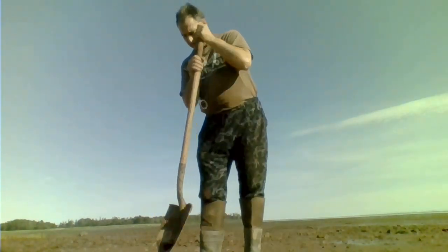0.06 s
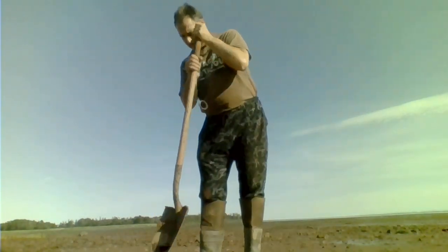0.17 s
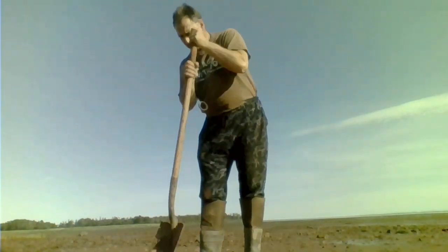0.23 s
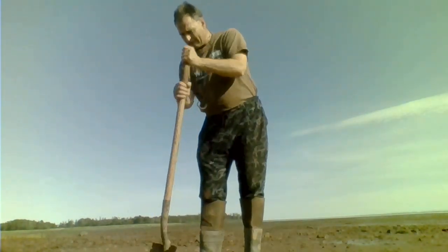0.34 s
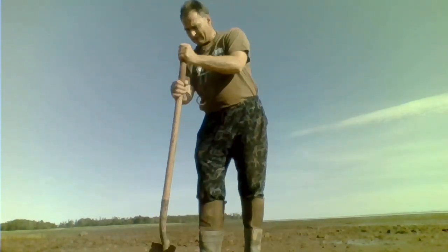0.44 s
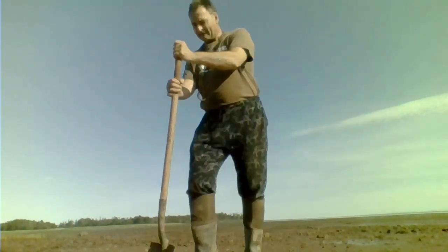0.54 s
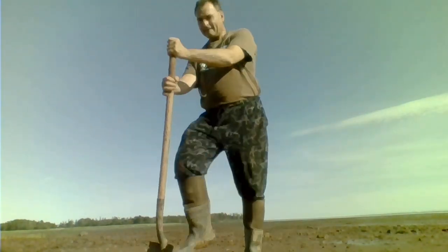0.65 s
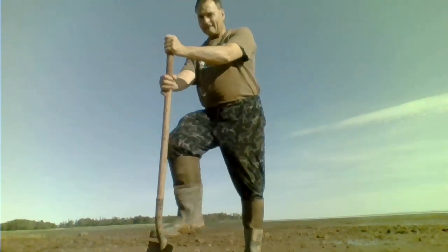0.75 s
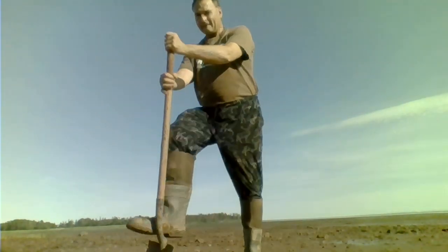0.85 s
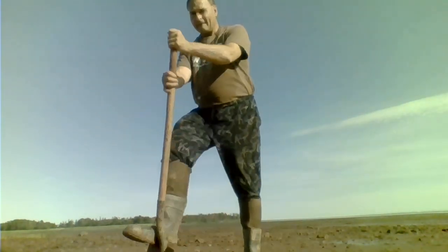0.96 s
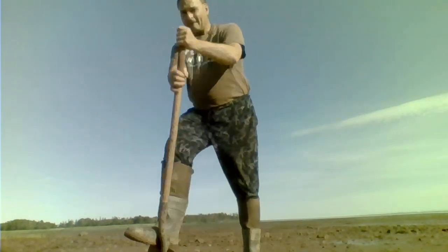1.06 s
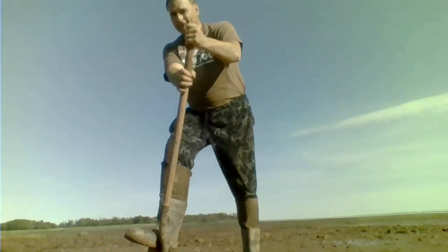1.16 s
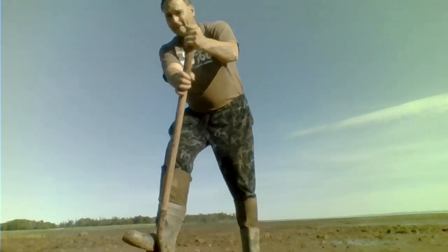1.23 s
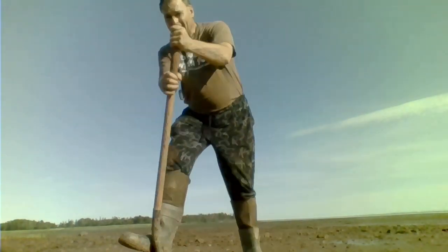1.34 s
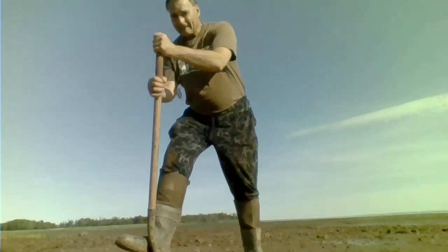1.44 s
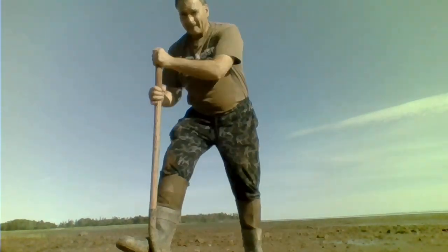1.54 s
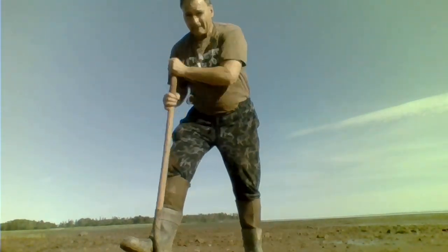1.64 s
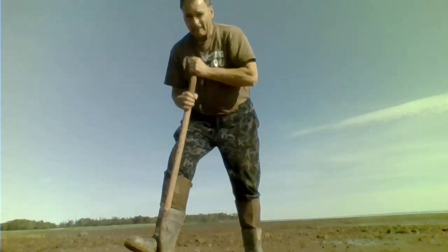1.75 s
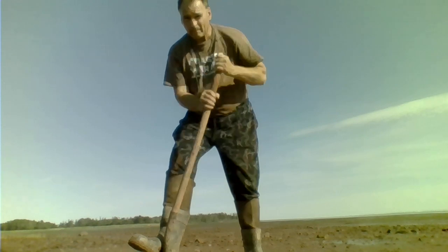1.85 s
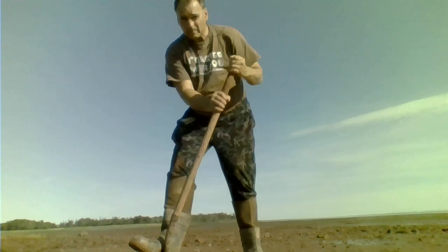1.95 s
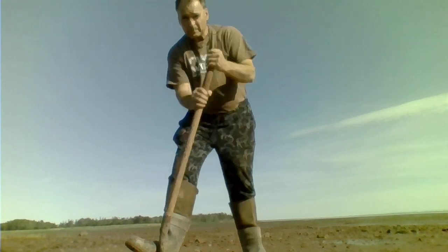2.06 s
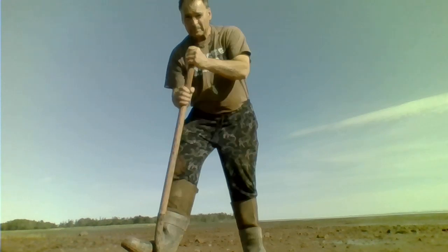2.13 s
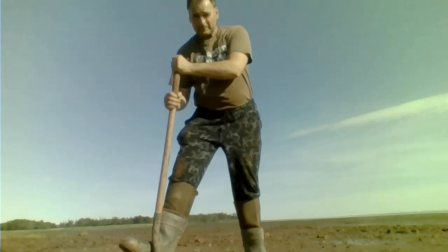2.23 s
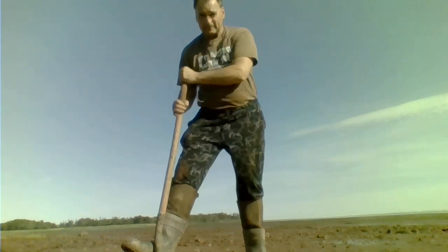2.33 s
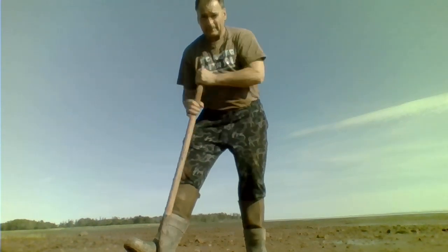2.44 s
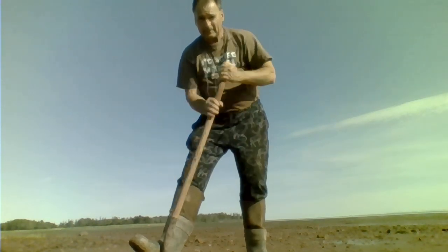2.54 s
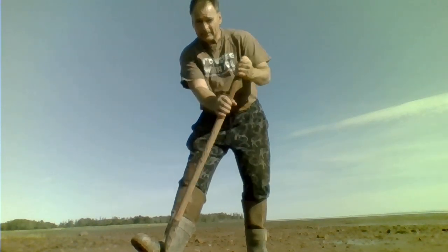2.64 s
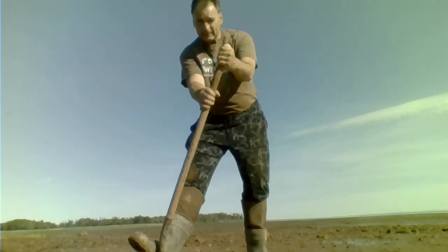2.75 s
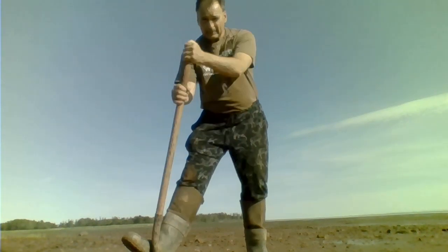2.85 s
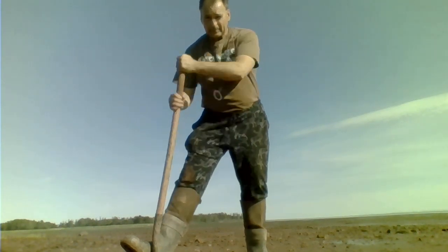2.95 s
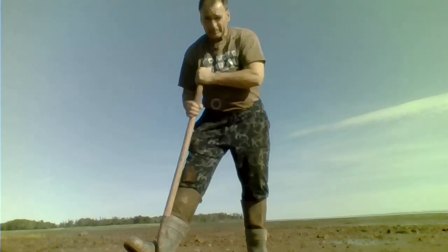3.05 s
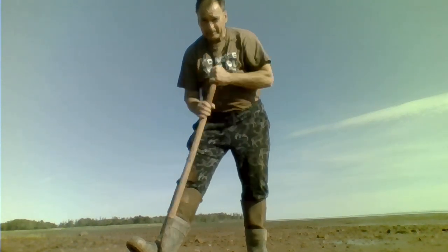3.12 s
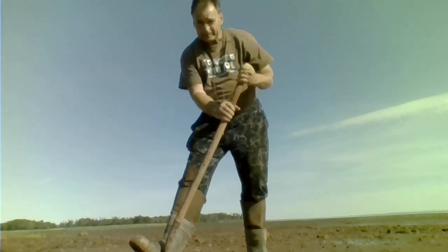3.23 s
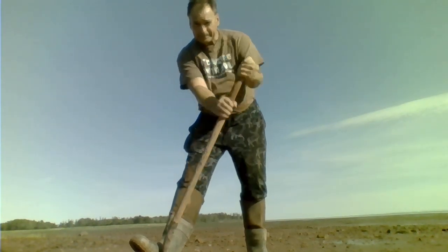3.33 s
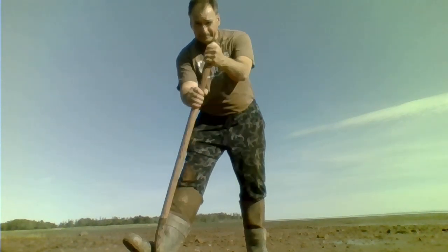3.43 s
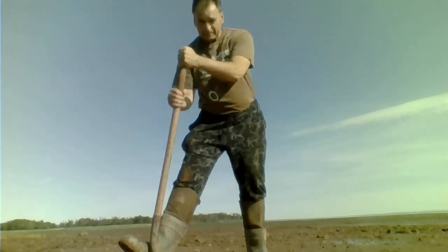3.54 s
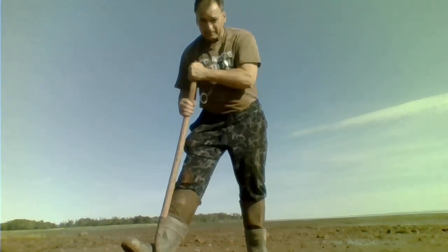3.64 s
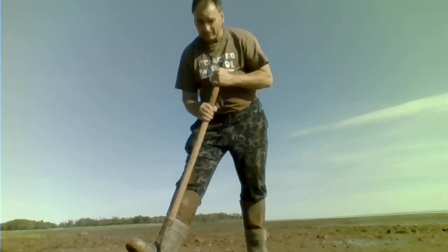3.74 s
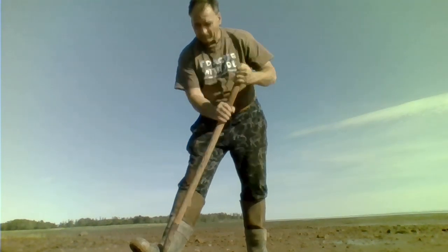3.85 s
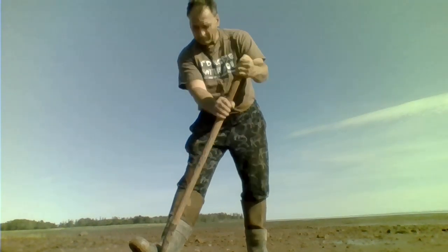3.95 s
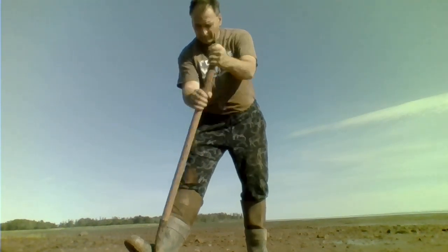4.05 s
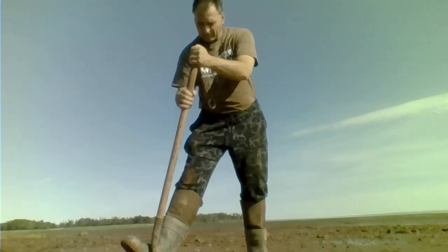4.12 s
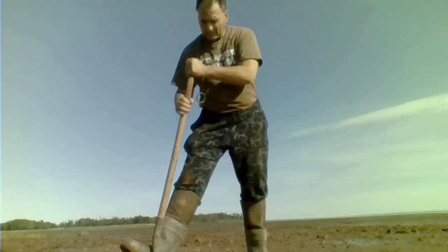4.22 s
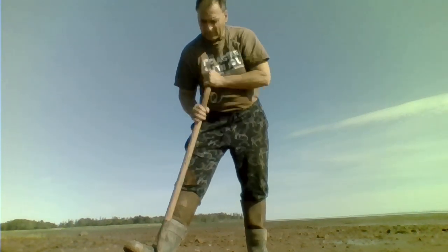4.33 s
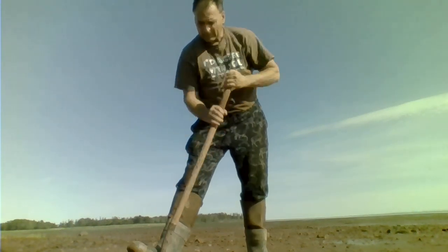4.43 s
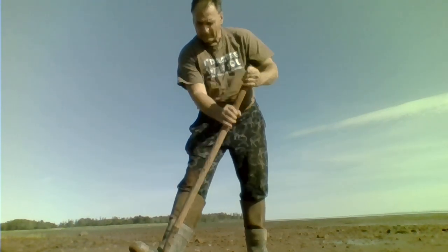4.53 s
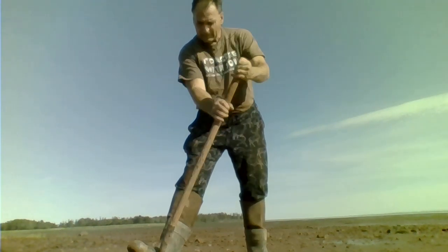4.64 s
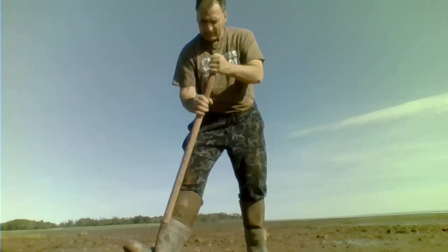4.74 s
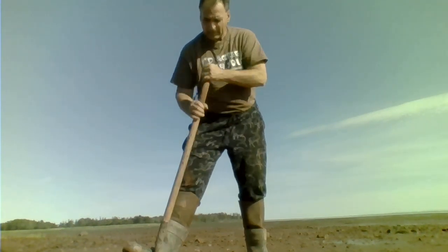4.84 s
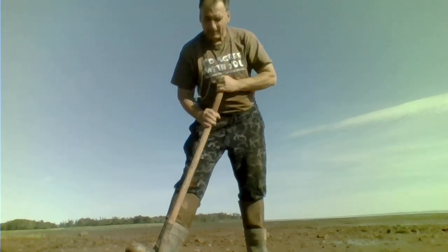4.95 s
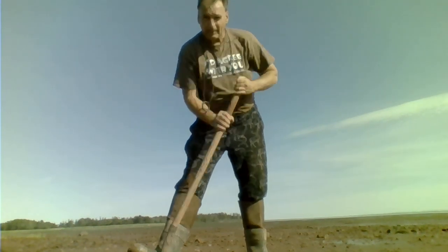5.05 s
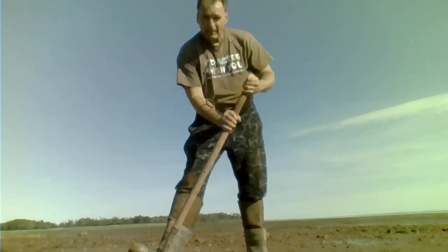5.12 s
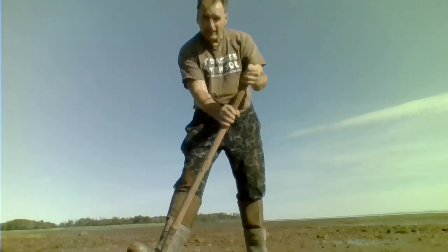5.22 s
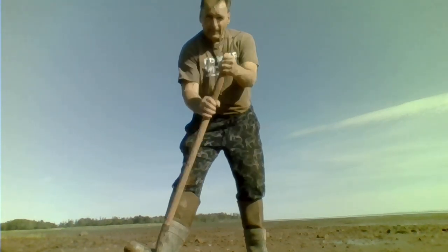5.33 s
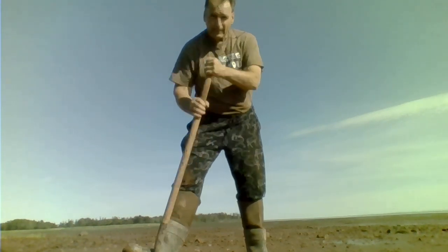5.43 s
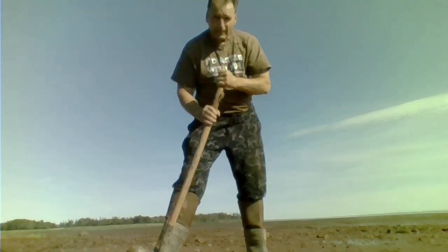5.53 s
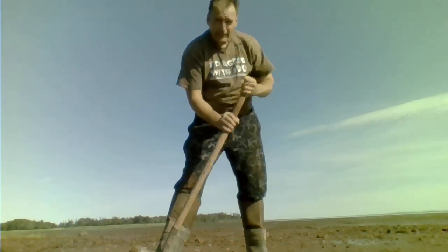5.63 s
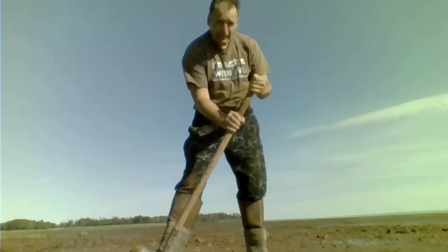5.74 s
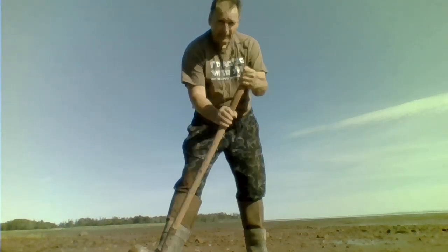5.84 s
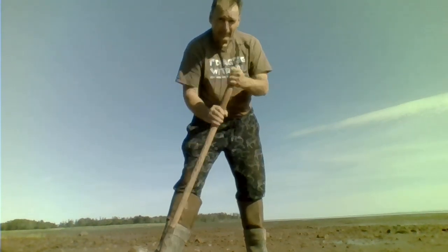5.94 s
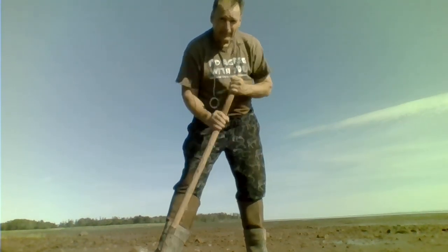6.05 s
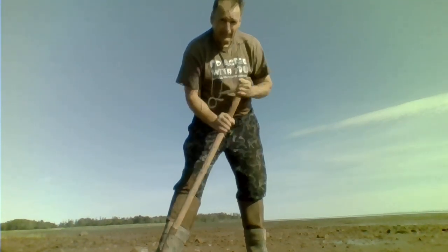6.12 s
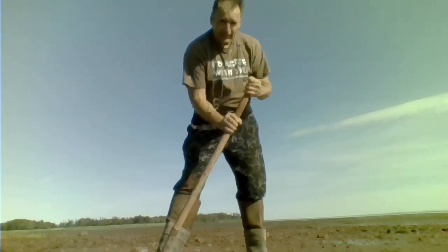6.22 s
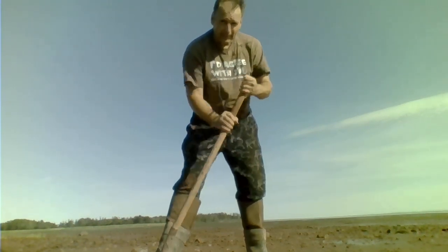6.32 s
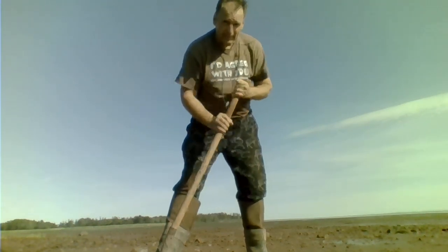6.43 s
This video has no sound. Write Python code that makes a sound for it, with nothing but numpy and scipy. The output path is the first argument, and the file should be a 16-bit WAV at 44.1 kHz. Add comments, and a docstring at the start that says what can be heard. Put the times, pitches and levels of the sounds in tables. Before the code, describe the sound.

Close, dry, outdoors with no echo: soft rustling shuffles over a faint low flutter, a sharp crunch as a shovel bites gritty mud, then a heavy boot knock on the blade. Rapid grinding lever strokes follow, about three or four a second, with squelchy pops, short sucking whistles, cracking shell bits and dull knocks, thinning toward the end.

```python
"""A gritty mud flat on open ground, small microphone close by: a steel shovel is dug in and levered.
A low flutter runs underneath as ragged pulses; soft shuffles of filtered noise come before the boot stamps.
Thrusts are bursts of grains; the boot, knocks and cracking shell bits ring as decaying resonances.
Lever strokes grind sand and mud on the buried blade: noise grains through its damped modes, gated by
stick-slip, with popping air pockets for the squelch and gliding whistles for the suction."""
import sys
import numpy as np
from scipy import signal
from scipy.fft import rfft, irfft
from scipy.io import wavfile
from scipy.ndimage import uniform_filter1d

SR = 44100
rng = np.random.default_rng(int(sys.argv[2]) if len(sys.argv) > 2 else 0)


def unload_wav(signal):
    """Save mono or channel-first audio to the path in sys.argv[1] as 16-bit WAV at rate SR, clipped to [-1, 1]."""
    wavfile.write(
        sys.argv[1],
        SR,
        np.round(np.clip(np.atleast_2d(signal).T, -1, 1) * 32767).astype(np.int16),
    )


N = 285768  # length [samples]


def undb(db):
    """Decibels to gain."""
    return 10 ** (np.asarray(db) / 20)


def unit(x):
    """Scale to an rms of one."""
    return x / np.sqrt(np.mean(x ** 2))


def seconds_axis():
    """Time of every sample [s]."""
    return np.arange(N) / SR


def colour(x, points):
    """Causal minimum-phase filter with the given spectrum, made by folding its cepstrum."""
    size = 4096
    hz, db = np.transpose(points)
    bins = np.maximum(np.arange(size // 2 + 1) * SR / size, 1)
    gain = undb(np.interp(np.log(bins), np.log(hz), db))
    cepstrum = irfft(np.log(gain))
    cepstrum[1:size // 2] *= 2
    cepstrum[size // 2 + 1:] = 0
    response = irfft(np.exp(rfft(cepstrum)))
    return signal.fftconvolve(x, response)[:N]


def resonate(x, modes):
    """Sum of damped resonances; a wider mode dies sooner."""
    out = 0
    for hz, width, db in modes:
        b, a = signal.iirpeak(hz, hz / width, fs=SR)
        out = out + undb(db) * signal.lfilter(b, a, x)
    return out


def fade(x, seconds):
    """Give every impulse an exponential tail."""
    return signal.lfilter([1], [1, -np.exp(-1 / (seconds * SR))], x)


def impacts(rate, spread_db):
    """Randomly timed impulses (rate per second), many small and a few large."""
    struck = rng.random(N) < rate / SR
    return struck * undb(spread_db * np.clip(rng.standard_normal(N), -2, 2))


def grains(rate, spread_db):
    """Sand grains striking from all sides, so with either sign."""
    return unit(impacts(rate, spread_db) * rng.choice([-1, 1], N))


def walk(rate):
    """Smooth random wandering with an rms of one; new values come at the given rate [Hz]."""
    step = int(SR / rate)
    steps = np.repeat(rng.standard_normal(N // step + 1), step)[:N]
    return unit(uniform_filter1d(uniform_filter1d(steps, step), step))


STOP_DB_PER_S = 720  # how fast the sound dies outside a stroke or spell


def held(start, end):
    """Gain that is full between two times and dies quickly outside them."""
    t = seconds_axis()
    outside = np.clip(np.maximum(start - t, t - end), 0, .5)
    return undb(-STOP_DB_PER_S * outside)


def spells(rows):
    """Power of the dull and the gritty part of steady spells of rubbing."""
    return sum(np.outer(undb([dull_db, grit_db]), held(start, end)) ** 2 for start, end, dull_db, grit_db in rows)


# low tone of the flutter: (frequency [Hz], relative level [dB])
FLUTTER_TONE = [(25, -47), (95, -29.5), (130, -1.5), (175, 3.5), (235, 0.5), (330, -7), (600, -61.5)]
FLUTTER_HZ, FLUTTER_START_S = 29.082, 0.022
FLUTTER_DB = -35  # ceiling of the flutter gain


def flutter(motion, uneven_db, smear, follow_db):
    """Soft, ragged low pulses, nearly even in time and uneven in strength; they fade when all motion rests."""
    beats = np.arange(FLUTTER_START_S, N / SR, 1 / FLUTTER_HZ)
    late, strong = rng.uniform(-1, 1, (len(beats), 2)).T
    starts = ((beats + 0.0008 * late) * SR).astype(int)
    pulses = np.zeros(N)
    pulses[np.minimum(starts, N - 1)] = undb(uneven_db * strong)
    puffs = unit(fade(pulses, 0.018) * rng.standard_normal(N))
    ragged = unit(pulses) + smear * puffs
    gain = np.minimum(undb(FLUTTER_DB), motion * undb(follow_db))
    return unit(colour(ragged, FLUTTER_TONE)) * gain


# spectra of the dull rustle and of its grit: (frequency [Hz], relative level [dB])
RUSTLE = [(100, -7), (250, 2), (500, 1.5), (1200, -4.5), (2000, -8), (2800, -8), (3600, -27), (5000, -42)]
RUSTLE_GRIT = [(700, -18), (1800, 0), (4000, -3), (6200, -10), (7500, -27)]
# soft shuffles before the boot comes down: (start [s], end [s], dull rustle level [dB], grit level [dB])
SHUFFLES = [(0, 0.18, -42, -71), (0.215, 0.255, -46.5, -70), (0.35, 0.385, -48, -59),
            (0.51, 0.61, -48, -50), (0.62, 0.71, -54.5, -69), (0.73, 0.93, -53, -60.5)]
STILL_DB = -65  # rustle left when nothing moves


def shuffling(dull_gain, grit_gain, throb_db):
    """A faint, patchy rustle as the weight shifts; it throbs with the flutter and has a thin whine in it."""
    dull = unit(colour(rng.standard_normal(N), RUSTLE))
    grit = unit(colour(grains(rate=2500, spread_db=4), RUSTLE_GRIT))
    whine = unit(resonate(rng.standard_normal(N), [(1680, 12, 3), (5700, 120, -11)]))
    throb = np.cos(2 * np.pi * FLUTTER_HZ * (seconds_axis() - FLUTTER_START_S))
    patches = undb(2 * walk(70) + throb_db * throb)
    rustle = (dull + undb(-14) * whine) * dull_gain + grit * grit_gain
    return rustle * patches + undb(STILL_DB) * (dull + undb(-5) * grit)


# air sucked through gaps in the mud:
# (middle [s], length [s], starting pitch [Hz], ending pitch [Hz], level [dB])
SUCKS = [(1.095, 0.024, 1820, 1900, -29), (1.155, 0.024, 1880, 1970, -26.5),
         (1.462, 0.016, 1175, 1320, -15), (1.635, 0.1, 1295, 1374, -28), (1.741, 0.26, 1810, 1700, -42),
         (3.551, 0.02, 1230, 1330, -15.5), (3.729, 0.015, 4600, 4750, -26), (3.937, 0.099, 734, 620, -21),
         (4.15, 0.02, 1980, 2130, -18), (4.516, 0.041, 707, 617, -18)]


def suction(rough_hz):
    """Air drawn through a narrow gap sounds as a short, rough, gliding whistle."""
    out = np.zeros(N)
    for middle, length, from_hz, to_hz, db in SUCKS:
        count = int(length * SR)
        hz = np.linspace(from_hz, to_hz, count) + rough_hz * walk(500)[:count]
        whistle = np.sqrt(2) * np.sin(2 * np.pi * np.cumsum(hz) / SR)
        unsteady = 1 + .5 * walk(300)[:count]
        start = int((middle - length / 2) * SR)
        out[start:start + count] += undb(db) * np.hanning(count) * whistle * unsteady
    return out


# blade damped by mud, its broad bending modes: (frequency [Hz], width [Hz], relative level [dB])
BENDING = [(507, 160, -4), (613, 128, -3), (663, 190, -12), (922, 200, -3), (1132, 184, -4.5),
           (1282, 98, -3)]
# its higher modes, rung by grit: (frequency [Hz], width [Hz], relative level [dB])
RINGING = [(1838, 180, 5.5), (2130, 440, 3), (2508, 346, 0.5), (3190, 480, -1.5), (3645, 450, -3),
           (4274, 1730, 1.5), (5600, 590, 0.5), (6440, 2100, -11.5)]
# spectra of the mud and of the grit: (frequency [Hz], relative level [dB])
MUD = [(150, -29), (330, -11), (480, -3), (900, 1), (1400, -3.5), (1900, -7.5), (3000, -30)]
GRIT = [(700, -9), (1400, -3), (1800, 2.7), (4000, 4), (6300, 1.3), (7200, -3), (7800, -12), (8600, -55)]
CATCH_DB = -41  # ceiling of the gain for small stones that catch on the moving blade


def catches(grit_db, below_db):
    """Small stones tick on the blade at random whenever it moves."""
    hits = grains(rate=30, spread_db=3)
    high = unit(colour(resonate(hits, RINGING), GRIT))
    low = unit(colour(resonate(hits, BENDING), MUD))
    return (high + undb(-3) * low) * undb(np.minimum(CATCH_DB, grit_db - below_db))


# shell bits cracking on the blade, before a common trim: (time [s], peak level [dB])
CRACKS = [(1.29, 2), (1.741, -9), (1.779, -5.5), (3.014, 8), (3.392, -0.5), (3.751, 1), (4.148, 2),
          (4.401, 2.5), (4.939, 1), (4.985, 1.5), (5.077, -3), (5.104, 1), (5.157, 5), (5.421, -2),
          (5.958, 0.5), (5.999, 6.5), (6.069, 3.5), (6.218, -2)]
# the blade knocks against packed clay: (time [s], peak level [dB])
KNOCKS = [(0.2055, -27), (1.327, -10), (3.063, -10), (3.551, -7), (3.752, -13), (3.9055, -1), (4.149, -5.5),
          (4.664, -9), (4.692, -11), (4.7345, -3), (4.756, -3), (4.966, -9.5), (5.038, -12), (5.851, -15),
          (6.155, -15), (6.411, -14.5)]


def blows(rows, bending_db, ringing_db, crumble_s, crumble_db):
    """Each blow sets the blade's modes ringing, then crumbles for a few milliseconds."""
    out, t = np.zeros(N + SR), np.arange(SR // 20) / SR
    tick = signal.unit_impulse(N)
    high = unit(colour(resonate(tick, RINGING), GRIT)[:len(t)])
    low = unit(colour(resonate(tick, BENDING), MUD)[:len(t)])
    ring = undb(ringing_db) * high + undb(bending_db) * low
    for when, db in rows:
        crumble = rng.standard_normal(len(t)) * np.exp(-t / crumble_s)
        force = tick[:len(t)] + undb(crumble_db) * crumble
        snap = signal.fftconvolve(force, ring)[:len(t)]
        start = int(when * SR)
        out[start:start + len(t)] += undb(db) * snap / np.abs(snap).max()
    return out[:N]


# quick thrusts and scuffs: (time [s], level [dB], hold [s], decay [s], low part against the high [dB])
THRUSTS = [(0.3062, -11.5, 0.019, 0.0115, -0.5), (0.503, -30, 0.008, 0.0066, -16),
           (0.539, -32.5, 0.004, 0.005, -20), (0.559, -41.5, 0.011, 0.011, -12),
           (0.721, -48, 0.002, 0.003, 0), (3.124, -23, 0.006, 0.02, 0), (3.55, -19, 0.006, 0.012, 5),
           (3.786, -17, 0.008, 0.014, 1), (3.904, -22, 0.012, 0.02, 9), (4.149, -20.5, 0.028, 0.02, -1),
           (5.057, -18.5, 0.0046, 0.011, -2), (5.355, -24.5, 0.011, 0.012, -2),
           (5.571, -9.5, 0.0056, 0.0035, -5.5), (5.946, -26, 0.02, 0.019, -1),
           (5.999, -12, 0.005, 0.012, -4)]
# low part of a thrust: (frequency [Hz], relative level [dB])
THRUST_LOW = [(40, -40), (120, -4), (280, -7), (550, 4.5), (1000, 4.5), (1500, 1.5), (2400, -19),
              (5000, -24.5)]
# fine spray of hard-pressed sand: (frequency [Hz], relative level [dB])
SPRAY = [(3000, -23), (5500, -7.5), (7000, 17), (8500, -23.5), (10000, -11)]


def thrusts():
    """The edge cuts quickly through the crust: a dense crunch that stops as the blade does."""
    t = seconds_axis()
    high = unit(colour(resonate(grains(rate=5000, spread_db=2), RINGING), GRIT))
    low = unit(colour(grains(rate=4000, spread_db=2), THRUST_LOW))
    spray = unit(colour(rng.standard_normal(N), SPRAY))
    out = np.zeros(N)
    for start, db, hold, decay, low_db in THRUSTS:
        attack = np.clip((t - start) / 0.002, 0, 1)
        gain = undb(db) * attack * np.exp(-np.maximum(t - start - hold, 0) / decay)
        # spray takes the gain twice, so harder thrusts are brighter
        out += gain * (high + undb(low_db) * low + undb(-4.5) * gain * spray)
    return out


# boot on the blade's step: (frequency [Hz], time to fall 60 dB [s], relative level [dB])
BOOT = [(492, 0.009, 8), (900, 0.0075, -7), (315, 0.03, -7), (190, 0.09, -22)]
# rumble of mud yielding: (frequency [Hz], relative level [dB])
RUMBLE = [(25, -33.5), (90, -23.5), (135, -0.5), (175, -2), (280, -2.5), (420, 0), (700, -30.5),
          (1500, -58.5)]
# hollow boom of the fresh cut: (frequency [Hz], width of one pass [Hz], relative level [dB])
HOLLOW = [(158, 35, 0)]
BOOT_S = 0.9272  # moment the boot lands
# level at first, and how fast it fades
SINK_DB, SINK_DB_PER_S = -22, 90
HOLLOW_DB, HOLLOW_DB_PER_S = -30, 15


def boot(gain_db):
    """A rubber boot knocks on the blade, which sinks with a short rumble and a lingering hollow boom."""
    t = np.maximum(seconds_axis() - BOOT_S, 0)
    knock = np.zeros(N)
    for hz, t60, db in BOOT:
        knock += undb(db) * np.sin(2 * np.pi * hz * t) * np.exp(-np.log(1000) * t / t60)
    soft_sole = 1 - np.exp(-t / 0.0009)  # also silences everything before the boot
    clods = grains(rate=700, spread_db=3)
    sink = undb(SINK_DB - SINK_DB_PER_S * t) * unit(colour(clods, RUMBLE))
    hollow = unit(resonate(resonate(clods, HOLLOW), HOLLOW))
    boom = undb(HOLLOW_DB - HOLLOW_DB_PER_S * t) * hollow
    return (undb(gain_db) * knock + sink + boom) * soft_sole


# each stroke swells to its hardest moment and slackens; its start and end lie this far below that moment
SWELL_DB, SLACKEN_DB, SWELL_CURVE, SLACKEN_CURVE = 10.7, 12.5, 1.48, 1.13


def push(start, hardest, end):
    """Gain of one stroke: it swells, peaks, slackens and stops."""
    t = seconds_axis()
    before = np.clip((hardest - t) / max(hardest - start, 1e-3), 0, 1)
    after = np.clip((t - hardest) / max(end - hardest, 1e-3), 0, 1)
    return held(start, end) * undb(-SWELL_DB * before ** SWELL_CURVE - SLACKEN_DB * after ** SLACKEN_CURVE)


# lever strokes:
# (start [s], hardest [s], end [s], mud level [dB], grit level [dB], pitch of the mud at the hardest [Hz])
STROKES = [(0.943, 0.967, 1.037, -18.0, -19.0, 920), (1.156, 1.244, 1.379, -14.5, -13.5, 920),
           (1.322, 1.462, 1.618, -17.0, -18.0, 960), (1.597, 1.61, 1.747, -26.5, -27.0, 1300),
           (1.749, 1.83, 1.957, -34.5, -27.5, 880), (1.958, 2.016, 2.127, -14.0, -13.0, 920),
           (2.12, 2.229, 2.342, -18.0, -17.0, 1080), (2.491, 2.575, 2.786, -19.5, -20.5, 960),
           (2.812, 2.889, 2.974, -22.0, -14.0, 1040), (2.874, 3.019, 3.043, -17.0, -18.0, 1070),
           (3.118, 3.212, 3.378, -16.0, -19.0, 920), (3.372, 3.397, 3.458, -24.5, -23.5, 880),
           (3.475, 3.649, 3.678, -14.5, -15.0, 1040), (3.748, 3.811, 3.96, -14.0, -17.5, 830),
           (3.902, 3.943, 4.046, -14.0, -21.0, 760), (4.132, 4.243, 4.331, -12.5, -15.0, 990),
           (4.374, 4.534, 4.594, -14.0, -17.0, 856), (4.655, 4.685, 4.786, -22.0, -39.0, 800),
           (4.782, 4.862, 4.992, -23.0, -17.5, 925), (5.041, 5.081, 5.307, -16.0, -18.0, 970),
           (5.396, 5.432, 5.524, -26.5, -21.0, 990), (5.535, 5.578, 5.611, -23.5, -21.5, 820),
           (5.641, 5.719, 5.853, -21.5, -22.5, 924), (5.954, 6.082, 6.111, -21.0, -22.0, 890),
           (6.153, 6.228, 6.294, -23.0, -24.5, 1030), (6.408, 6.442, 6.488, -28.5, -28.0, 790)]
# steady drag while weight stays on the handle: (start [s], end [s], mud level [dB], grit level [dB])
DRAGS = [(0.935, 1.659, -32.0, -31.5), (1.693, 1.791, -41.0, -40.5), (1.805, 2.397, -29.0, -28.5),
         (2.383, 2.503, -38.5, -42.0), (2.539, 4.993, -27.5, -30.5), (5.064, 5.85, -30.0, -33.5),
         (5.916, 5.92, -29.0, -32.0), (6.371, 6.418, -42.5, -42.5)]
DRAG_HZ = 850  # pitch of the mud between strokes
GRIT_LEAD_S = 0.003  # the grit bites before the mud gives
SAG_OCT_PER_S = 1.0  # the mud deepens as a stroke goes on


def levering():
    """Strokes on top of the drag give the level of mud and grit (dB) and the pitch of the mud (Hz)."""
    t = seconds_axis()
    mud, grit = spells(DRAGS)
    octave = mud * np.log2(DRAG_HZ)  # pitch is averaged by power
    for start, hardest, end, mud_db, grit_db, hz in STROKES:
        power = (undb(mud_db) * push(start, hardest, end)) ** 2
        mud = mud + power
        grit = grit + (undb(grit_db) * push(start, hardest - GRIT_LEAD_S, end)) ** 2
        octave = octave + power * (np.log2(hz) - SAG_OCT_PER_S * np.clip(t - hardest, -.5, .5))
    return 10 * np.log10(mud), 10 * np.log10(grit), 2 ** (octave / mud)


def blade(x, modes, centre_hz, focus_db, shift_db):
    """The blade rings most near the centre frequency; shifting mud damps now one mode, now another."""
    gains = []
    for hz, _, _ in modes:
        distance = np.abs(np.log2(hz / centre_hz))  # octaves
        gains.append(undb(shift_db * walk(13) - focus_db * distance))
    norm = np.sqrt(np.mean(np.square(gains), axis=0))
    return sum(resonate(x, [mode]) * gain for mode, gain in zip(modes, gains)) / norm


def stick_slip(rate, release_s, creep):
    """The blade sticks, lets go at once and settles again, over a steady creep."""
    slips = (rng.random(N) < rate / SR) * rng.random(N) ** 2
    speed = creep + unit(fade(slips, release_s))
    # the slips' level is evened out over a sixteenth of a second, leaving fine crackle
    return unit(speed / uniform_filter1d(speed, SR // 16))


def squelch(rate, low_hz, high_hz, cycles, glide):
    """Small air pockets pop in the wet mud, each rising in pitch."""
    out, t = np.zeros(N + SR), np.arange(SR // 20) / SR
    for when, pitch, size in rng.random((int(rate * N / SR), 3)):
        hz = low_hz * (high_hz / low_hz) ** pitch
        age = t * hz / cycles
        rise = 1 + glide * np.minimum(age, 10)
        start = int(when * N)
        out[start:start + len(t)] += size ** 2 * np.exp(-age) * np.sin(2 * np.pi * hz * t * rise)
    return unit(out[:N])


GRIT_HZ, GRIT_OCT_PER_DB = 2960, 0.06  # grit rings at this pitch at -20 dB, higher when pressed harder


def digging(mud_db, grit_db, mud_hz):
    """Each lever stroke grinds mud and grit along the blade; both share the same slips."""
    grit_hz = GRIT_HZ * 2 ** (GRIT_OCT_PER_DB * np.maximum(grit_db + 20, -20))
    slips = stick_slip(rate=190, release_s=0.004, creep=2.6)
    clods = blade(grains(rate=1100, spread_db=-1.5), BENDING, mud_hz, focus_db=11.0, shift_db=4.0)
    sand = blade(grains(rate=4500, spread_db=-1.0), RINGING, grit_hz, focus_db=6.0, shift_db=2.5)
    wet = squelch(rate=120, low_hz=532.3, high_hz=1643, cycles=13.7, glide=0.037)
    # water films between the grains burst as tiny bubbles
    fizz = squelch(rate=170, low_hz=1909, high_hz=6510, cycles=36, glide=0.0074)
    heave = unit(colour(grains(rate=900, spread_db=3), RUMBLE))
    grinding = undb(-1) * unit(colour(clods, MUD)) * slips
    mud = undb(mud_db) * (grinding + undb(-7.0) * wet + undb(-17) * heave)
    grit = undb(grit_db) * (undb(-0.4) * unit(colour(sand, GRIT)) + undb(-11.0) * fizz)
    # the finest hiss grows faster than the rest, so hard strokes are brighter
    spray = undb(1.68 * grit_db - 6) * unit(colour(rng.standard_normal(N), SPRAY))
    return (mud + (grit + spray) * slips) * (seconds_axis() > BOOT_S)


def scene():
    """Everything happens close by in the open air, with no echo."""
    mud_db, grit_db, mud_hz = levering()
    rustle, scratch = np.sqrt(spells(SHUFFLES))
    low = flutter(undb(mud_db) + rustle, uneven_db=4.5, smear=0.9, follow_db=2.5)
    shuffles = shuffling(rustle, scratch, throb_db=3)
    stones = catches(grit_db, below_db=8)
    cracks = undb(-9.0) * blows(CRACKS, bending_db=-5.5, ringing_db=-1.0, crumble_s=0.0022, crumble_db=-16.5)
    knocks = blows(KNOCKS, bending_db=9.5, ringing_db=-9.5, crumble_s=0.0038, crumble_db=-25)
    strikes = cracks + knocks + thrusts() + boot(gain_db=0.5)
    strokes = digging(mud_db, grit_db, mud_hz) + suction(rough_hz=85.0)
    return (low + shuffles + stones + strikes + strokes)[None]


BOTTOM_HZ, TOP_HZ = 108, 8450  # range of the microphone


def record(dry):
    """The microphone thins the bass, passes little treble and rounds off the hardest peaks."""
    thin = signal.sosfilt(signal.butter(3, BOTTOM_HZ, "high", fs=SR, output="sos"), dry)
    dull = signal.sosfilt(signal.butter(12, 7400, fs=SR, output="sos"), thin)
    rounded = dull / (1 + (dull / .87) ** 8) ** (1 / 8)
    return signal.sosfiltfilt(signal.ellip(8, .1, 50, TOP_HZ, fs=SR, output="sos"), rounded)


dry = scene()
out = record(dry)
unload_wav(out)
```